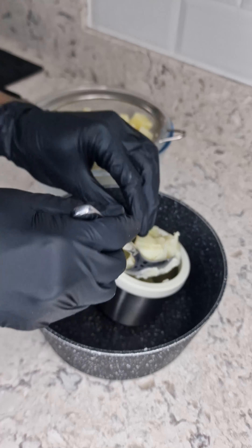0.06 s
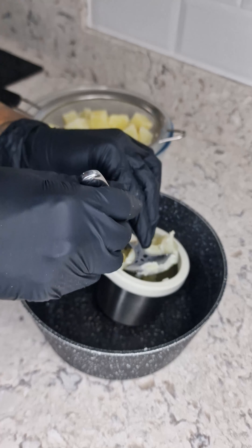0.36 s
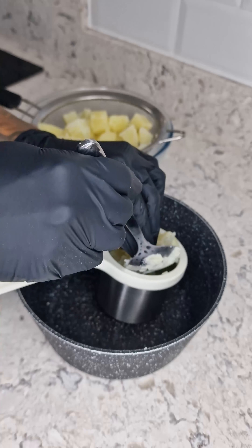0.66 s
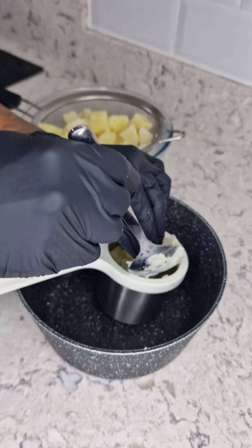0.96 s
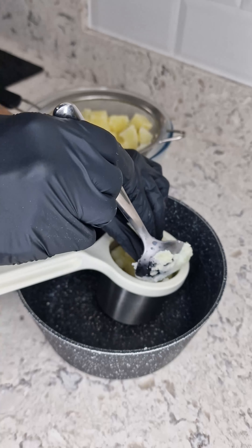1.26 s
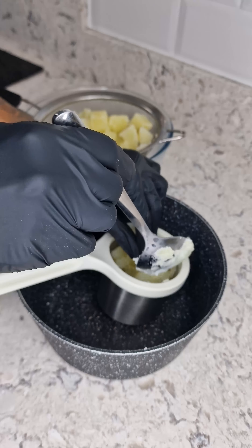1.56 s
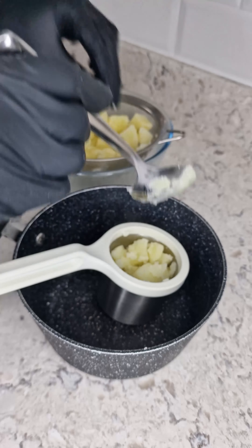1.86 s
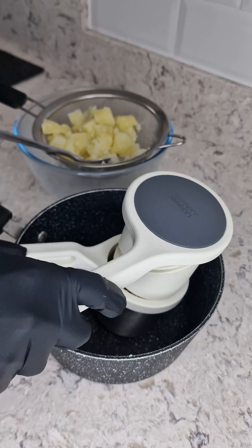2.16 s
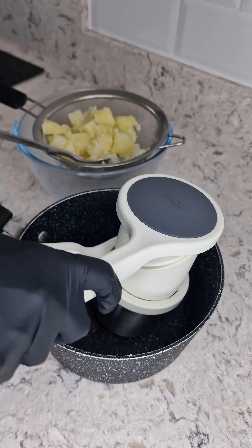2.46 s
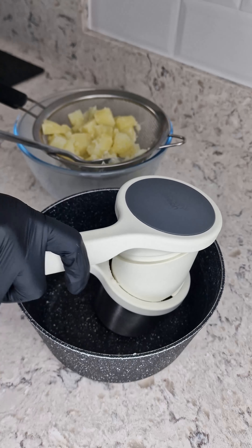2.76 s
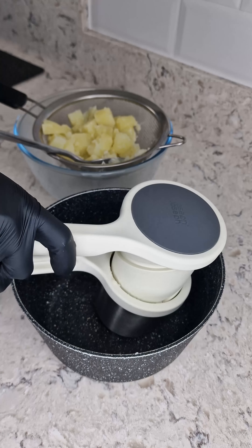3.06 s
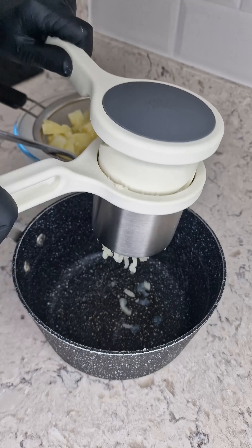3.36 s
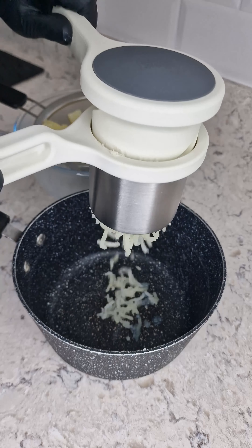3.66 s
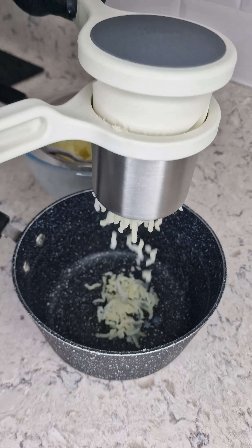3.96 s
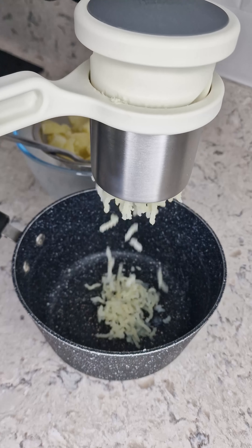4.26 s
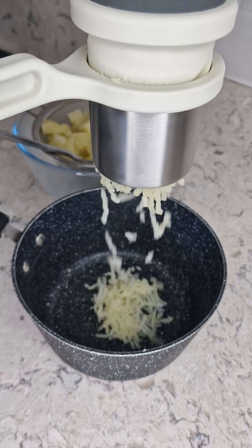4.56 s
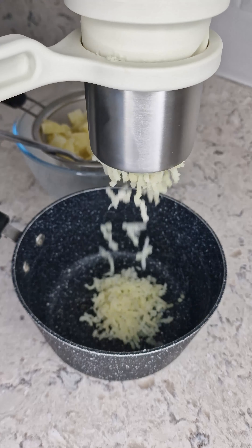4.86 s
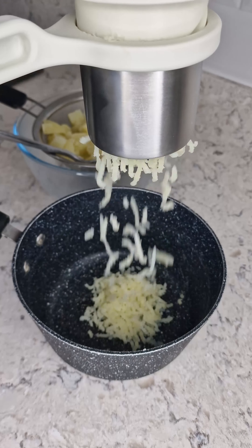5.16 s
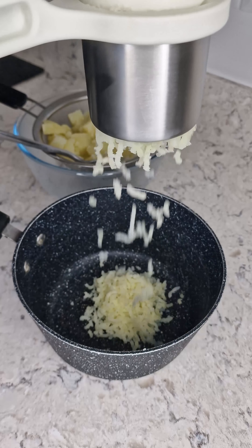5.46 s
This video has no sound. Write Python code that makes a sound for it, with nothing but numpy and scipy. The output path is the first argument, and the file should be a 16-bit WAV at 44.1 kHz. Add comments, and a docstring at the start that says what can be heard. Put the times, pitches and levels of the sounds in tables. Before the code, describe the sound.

Close stereo microphones pick up a small kitchen with a low, steady rumble. In the first second a spoon loads cooked potato into a metal ricer with faint wet smacks and soft nudges against a pot, clinking once at about 0.6 seconds. After a lull and some light handling, the ricer knocks hollowly on the pot at 2.3 seconds with a brief steel rattle, and the plunger rubs faintly down the cup. At 3 seconds comes a second rattling knock, the loudest sound, its ringing cut off abruptly just after 3.1 seconds. Wet potato then fizzes and crackles quietly through the holes. Trapped air spits out in short bursts, strongest from 3.6 to 3.9 seconds and again between 4.2 and 4.7. Soft strands patter into the pot with a few low plops, and the crackle thins away toward the end at about 5.6 seconds.

```python
"""A small kitchen, a spaced microphone pair close to a potato ricer standing in a pot on a stone worktop.
A spoon fills the ricer with faint wet smacks and clinks once. The steel parts rattle, the plunger rubs
down the cup, and the ricer knocks twice on the pot. At 3.144 s an abrupt cut ends the knocks' ringing
and the sound of pressing above the pot begins: wet potato fizzes through the holes, trapped air spits
out, and soft strands patter down over the low rumble of the room."""
import sys
import numpy as np
from scipy import signal
from scipy.fft import rfft, irfft
from scipy.io import wavfile

SR = 44100
rng = np.random.default_rng(int(sys.argv[2]) if len(sys.argv) > 2 else 0)


def unload_audio(sound):
    """Save the sound as a 16-bit wav file, at the path given as the first command line argument."""
    columns = np.transpose(np.atleast_2d(sound))
    # keep every value between -1 and 1, then stretch to whole-number steps
    steps = np.round(np.clip(columns, -1, 1) * 32767)
    wavfile.write(sys.argv[1], SR, steps.astype(np.int16))


N = 246959
T = np.arange(N) / SR
RING = T[:SR * 3 // 4]  # time axis of one short sound
BREAK_S = 3.144  # a cut ends the knocks' ringing and reverb; the pressing sound begins

# the quiet kitchen: f/Hz, level/dB
ROOM_SPECTRUM = [(15, -2.5), (30, 2.5), (50, 2.5), (90, -9.5), (130, -8), (200, -28), (400, -28),
                 (500, -37), (590, -23), (750, -38), (2000, -43), (7000, -49.5), (16000, -65)]
# the pot with the ricer in it, and the worktop under it: f/Hz, level/dB, t60/s
POT_MODES = [(226, -22, 0.53), (296, -21, 0.39), (319, -12, 0.14), (426, -12.5, 0.27), (457, -14.5, 0.36),
             (504, -8, .2), (545, -12, 0.095), (607, -4.5, 0.67), (648, 3.5, .1), (670, -7.5, 0.12),
             (710, -14.5, .18), (750, -7.5, 0.054), (822, -14, 0.11), (979, -14, 0.12), (1110, -9.5, 0.054),
             (1162, -10, 0.072), (1405, -12.5, 0.08), (1823, -20.5, 0.067), (2050, -20.5, 0.18)]
WORKTOP_MODES = [(131, -9.5, 0.17), (180.3, -17.5, 0.097)]
# the dense, short part of a blow: f/Hz, level/dB
THUD_SPECTRUM = [(50, -12), (130, -0.5), (300, -17.5), (600, 7), (900, -8.5), (1500, -6), (3000, -13.5),
                 (8000, -41), (16000, -31)]
# soft nudges of the pot as the ricer is handled: t/s, level/dB, low-pass f/Hz
POT_NUDGES = [(0.058, -52, 1160), (0.25, -55.5, 425), (0.528, -51.5, 625), (0.769, -60, 565),
              (1.977, -55, 1400), (2.24, -37.5, 143), (2.261, -42, 640), (2.848, -43, 170)]
# wet smacks of potato on spoon and strands: t/s, level/dB, length/s, f/Hz
WET_SMACKS = [(0.18, -76.5, 0.034, 6040), (0.475, -70.5, 0.034, 5130), (0.553, -64.5, 0.028, 7240),
              (1.037, -72, 0.0065, 7800), (2.073, -73.5, 0.0027, 7350), (3.135, -72, 0.086, 2170),
              (3.143, -55.5, 0.037, 11600), (3.403, -61, 0.023, 1280), (3.931, -66.5, 0.02, 1260),
              (4.539, -56, 0.016, 1370), (4.769, -61.5, 0.0044, 7800), (4.815, -69.5, .012, 4080),
              (4.915, -61.5, 0.0029, 1640), (4.947, -62.5, 0.003, 2800), (4.977, -60.5, 0.0022, 7100),
              (5.062, -67, 0.0038, 7640), (5.292, -69.5, 0.0044, 4550)]
# the spoon against the rim: t/s, level/dB
SPOON_CLINKS = [(0.585, -65), (0.6, -44.5), (0.6067, -55.5)]
# the spoon and the rim it strikes: f/Hz, level/dB, t60/s
SPOON_MODES = [(402.5, -17.5, 0.59), (515, 1.5, 0.11), (1014, -26, 0.32), (1096, 9.5, 0.041),
               (1112, -18.5, 0.23), (1160, -9, 0.16), (1407, -23, 0.16), (2034, -14.5, 0.097),
               (2606, -2, 0.043), (2624, -7, 0.076)]
# the clack of spoon on plastic rim: f/Hz, level/dB
CLACK_SPECTRUM = [(200, -1.5), (450, 10), (750, -4), (1000, -2), (1170, 4), (1400, 3), (2200, -4),
                  (2600, 2), (3000, -21), (4200, -15), (8000, -39), (16000, -37)]
# cup and plunger chattering: t/s, level/dB, length/s, low-pass f/Hz, relative cup ring/dB
STEEL_RATTLES = [(1.978, -61, 0.0075, 4250, -33), (2.334, -41, 0.0087, 2440, -21.5),
                 (3.017, -24, 0.011, 3856, -23), (3.021, -37, 0.0084, 12750, -19)]
# the steel cup: f/Hz, level/dB, t60/s
CUP_MODES = [(2147, -5, 0.26), (2640, 0.5, 0.088), (3570, -6.5, .18), (4503, -4, 0.18), (5520, -7, 0.16),
             (7393, -4.5, 0.12), (8060, -2, 0.33), (8320, -1, 0.3), (7680, -17, .16), (11200, -12, .12)]
# hard knocks on the pot: t/s, level/dB, low-pass f/Hz, relative worktop thump/dB, first bounce after/s
RICER_KNOCKS = [(2.332, -25, 850, 3, .0242), (2.338, -26, 1700, 2, .0225), (2.995, -28, 1200, 3, .028),
                (3.016, -12.5, 1900, -5, .022)]
# the plunger rubbing the cup wall, then crushing the potato: t/s, hold/s, level/dB
PLUNGER_RUBS = [(2.36, 0.12, -69), (2.58, 0.42, -68.5)]
PLUNGER_CRUSHES = [(2.83, 0.28, -62), (2.9, 0.024, -67.5)]
# the tone of that rubbing and crushing: f/Hz, level/dB
RUB_SPECTRUM = [(100, -26.5), (300, -10.5), (520, -3.5), (660, 5.5), (850, -16.5), (1170, 0.5),
                (1600, -14.5), (2500, -27.5), (6000, -30.5)]
CRUSH_SPECTRUM = [(500, -24.5), (900, -12.5), (1190, 11.5), (1900, -6), (2550, 1.5), (3400, -3), (4500, -8),
                  (7500, -12), (10000, -15), (16000, -19.5)]
# squeezes of the handles that drive potato through the holes: t/s, hold/s, level/dB
HANDLE_SQUEEZES = [(3.1, 0.054, -70.5), (3.25, 0.31, -76), (3.56, 0.29, -63.5), (4.21, 0.58, -76)]
# wet potato in the holes, and strands landing in the pot: f/Hz, level/dB
FIZZ_SPECTRUM = [(500, -45), (900, -14.5), (1300, -4), (1700, -16), (2500, -4), (3400, -8.5), (4200, -7.5),
                 (6000, -6), (7500, -1), (9500, -10.5), (11500, -6), (15000, -11)]
PATTER_SPECTRUM = [(80, -29), (140, 13.5), (250, -35), (430, 4.5), (560, -3), (660, 14.5), (800, -14.5),
                   (1000, -3), (1300, 11.5), (1900, -8.5), (4000, -28), (9000, -40)]
# larger air pockets escaping: t/s, level/dB, length/s, whistle f/Hz
AIR_SPITS = [(3.229, -61, 0.0016, 11200), (3.264, -55, 0.0099, 2030), (3.301, -56, 0.0038, 8400),
             (3.406, -54, 0.0033, 6500), (3.571, -45, 0.002, 6760), (3.601, -56.5, .007, 4220),
             (3.639, -39.5, .0091, 5940), (3.701, -35.5, 0.005, 2700), (3.802, -44.5, 0.0032, 2800),
             (3.818, -48.5, 0.0076, 5200), (3.854, -49, 0.0035, 2670), (3.879, -51.5, 0.0079, 4130),
             (4.206, -45, 0.0045, 2900), (4.264, -54.5, 0.02, 2880), (4.298, -56, 0.028, 2960),
             (4.442, -54.5, 0.018, 2890), (4.485, -50.5, 0.0031, 2880), (4.555, -52, 0.013, 12000),
             (4.661, -59.5, 0.0026, 3216), (4.692, -51.5, 0.0032, 7650)]
# the spitting air: f/Hz, level/dB
SPIT_SPECTRUM = [(100, -27), (400, -5.5), (750, -23), (1400, -5), (2000, 1), (2700, 3.5), (3300, 1),
                 (4200, 0.5), (6000, 3), (7600, 9.5), (9500, -0.5), (11500, 6), (16000, -2.5)]
# thumps of escaping air (first two rows), then strands landing: t/s, level/dB, low-pass f/Hz
LOW_PLOPS = [(4.211, -50.5, 1500), (4.555, -55.5, 1200), (4.746, -57, 900), (4.835, -48.5, 990),
             (4.866, -84, 702), (4.945, -59, 830), (5.297, -53.5, 750), (5.52, -63.5, 740)]


def amp(db):
    """Decibels to gain."""
    return 10 ** (np.asarray(db) / 20)


def unit(x):
    """Scale to rms 1."""
    return x / np.sqrt(np.mean(x ** 2))


def colour(x, points, tilt_db=0):
    """Give x a spectrum of (f/Hz, level/dB) points, tilted per octave; rms 1."""
    hz, db = np.transpose(points)
    octave = np.log2(np.fft.rfftfreq(len(x), 1 / SR) + 1)
    gain = amp(np.interp(octave, np.log2(hz), db) + tilt_db * octave)
    return unit(irfft(rfft(x) * gain, len(x)))


def soften(x, hz, order=2):
    """Low-pass: a softer contact lasts longer."""
    return signal.sosfilt(signal.butter(order, hz, fs=SR, output="sos"), x)


def thin(x, hz):
    """High-pass: small bodies radiate no deep bass."""
    return signal.sosfilt(signal.butter(2, hz, "high", fs=SR, output="sos"), x)


def ring(modes):
    """Impulse response of damped modes."""
    return sum(amp(db - 60 * RING / t60) * np.sin(2 * np.pi * hz * RING) for hz, db, t60 in modes)


def grains(size, per_s, spread_db):
    """Random clicks, many small and a few large."""
    occurs = rng.random(size) < per_s / SR
    height = np.minimum(rng.exponential(size=size), np.pi)
    return occurs * rng.choice([-1, 1], size) * amp(spread_db * height)


def burst(length):
    """Envelope that opens at once, holds for its length and collapses."""
    return (1 - np.exp(-RING / .0005)) / np.sqrt(1 + (RING / length) ** 6) * np.exp(-RING / .2)


def efforts(rows, attack_s, release_db_per_s):
    """Gain over time of pushes by hand: each builds up, holds and dies away."""
    return sum(np.clip((T - s) / attack_s, 0, 1) * amp(db - release_db_per_s * np.maximum(T - s - hold, 0))
               for s, hold, db in rows)


def pan(left_db):
    """Gains that make the left microphone louder than the right by left_db."""
    return amp(np.array([[left_db], [-left_db]]) / 2)


def add(track, s, sound):
    """Mix a sound in at time s."""
    start = int(s * SR)
    part = sound[..., :N - start]
    track[..., start:start + part.shape[-1]] += part


def room_tone(level_db=-65, side_db=-20):
    """Low steady rumble with a faint hiss, nearly alike at both microphones."""
    mid = colour(rng.standard_normal(N), ROOM_SPECTRUM)
    side = amp(side_db) * colour(rng.standard_normal(N), ROOM_SPECTRUM)
    return amp(level_db) * np.array([mid + side, mid - side])


def blow(db, cutoff_hz, thump_db, thud_db=-10, thud_t60=0.13):
    """One contact thuds, rings the pot and thumps the worktop."""
    pot = thin(ring(POT_MODES), 410) / 2
    thud = colour(rng.standard_normal(len(RING)), THUD_SPECTRUM) * amp(thud_db - 60 * RING / thud_t60)
    thump = amp(thump_db) * ring(WORKTOP_MODES)
    return amp(db) * thin(soften(pot + thud + thump, cutoff_hz, order=4), 71)


def nudges(rise_s=0.0015, damping_s=0.082):
    """Handling nudges the pot softly, and the gloved hand stills it."""
    out = np.zeros(N)
    held = (1 - np.exp(-RING / rise_s)) * np.exp(-RING / damping_s)
    for s, db, hz in POT_NUDGES:
        add(out, s, blow(db, hz, thump_db=3.5) * held)
    return out


def smacks(shoulder_db=-11, skirt_db=-22, swell=0.23):
    """Wet films part with a short crackle around one pitch; a long one swells in slowly."""
    out = np.zeros(N)
    for s, db, length, hz in WET_SMACKS:
        band = [(hz / 8, 2 * skirt_db), (hz / 2, skirt_db), (hz / 1.27, shoulder_db),
                (hz, 0), (hz * 1.26, shoulder_db), (hz * 2, skirt_db)]
        crackle = colour(grains(len(RING), per_s=5000, spread_db=6.2), band)
        envelope = burst(length) * (1 - np.exp(-RING / (swell * length)))
        add(out, s, amp(db) * envelope * crackle)
    return out


def spoon(clack_db=-5, ring_db=-4):
    """The loaded spoon clacks on the rim and rings briefly."""
    out, modes = np.zeros(N), ring(SPOON_MODES)
    for s, db in SPOON_CLINKS:
        clack = colour(rng.standard_normal(len(RING)), CLACK_SPECTRUM) * burst(0.0043)
        add(out, s, amp(db) * (amp(ring_db) * modes + amp(clack_db) * clack))
    return thin(out, 140)


def rattles():
    """Loose parts chatter for a few milliseconds and leave the steel cup ringing."""
    out, cup = np.zeros(N), ring(CUP_MODES)
    for s, db, length, hz, ring_db in STEEL_RATTLES:
        chatter = unit(grains(len(RING), per_s=7200, spread_db=1.5)) * burst(length)
        add(out, s, amp(db) * soften(chatter + amp(ring_db) * cup, hz))
    return thin(out, 620)


def knocks(bounces=4, shortening=0.95, loss_db=9, dulling=0.62):
    """The ricer strikes the pot and rocks on it, each bounce sooner, weaker and duller."""
    out = np.zeros(N)
    for s, db, hz, thump_db, gap in RICER_KNOCKS:
        for k in range(bounces + 1):
            add(out, s, blow(db - k * loss_db, hz * dulling ** np.sqrt(k), thump_db))
            s += gap * shortening ** k
    return out


def plunger(attack_s=0.023, release_db_per_s=151):
    """The plunger rubs down the cup in fine slips and starts to crush the potato."""
    slips = colour(grains(N, per_s=900, spread_db=3), RUB_SPECTRUM)
    squish = colour(grains(N, per_s=3000, spread_db=3.9), CRUSH_SPECTRUM)
    return (slips * efforts(PLUNGER_RUBS, attack_s, release_db_per_s)
            + squish * efforts(PLUNGER_CRUSHES, attack_s, release_db_per_s))


def flow(seep_db=-86):
    """How fast potato passes the holes, as a gain; it seeps on between squeezes."""
    return efforts(HANDLE_SQUEEZES, attack_s=0.02, release_db_per_s=83) + amp(seep_db)


def holes(size, spectrum, per_s, spread_db, tilt_db=0, width=0.71):
    """Crackle from many holes: the middle ones reach both microphones, those at each edge only one."""
    middle, left, right = (colour(grains(size, per_s, spread_db), spectrum, tilt_db) for _ in range(3))
    return unit(middle + width * np.array([left, right]))


def fizz(fit_s=0.0041, steady=2.1):
    """Tiny bubbles fizz with the flow, in short fits as single holes clog and open again."""
    openings = np.abs(grains(N, per_s=55, spread_db=7.2))
    fits = steady + unit(signal.fftconvolve(openings, burst(fit_s))[:N])
    crackle = holes(N, FIZZ_SPECTRUM, per_s=3500, spread_db=4.3)
    return unit(crackle * fits) * flow() * (T > BREAK_S) * pan(left_db=2)


def strands(level_db=-76, tap_s=0.0038, fall_s=0.04, growth=0.54):
    """Soft strands fall and patter on the bottom of the pot; the patter grows more slowly than the flow."""
    impacts = grains(N, per_s=60, spread_db=5)
    tap = rng.standard_normal(len(RING)) * np.exp(-RING / tap_s)
    patter = colour(signal.fftconvolve(impacts, tap)[:N], PATTER_SPECTRUM)
    landing = np.interp(T - fall_s, T, flow())
    return amp(level_db) * patter * (landing / landing.max()) ** growth * (T > BREAK_S)


def bubbles(count=70, low_hz=1523, high_hz=7040, decay_cycles=6.3):
    """Bubbles burst at random in the wet strands, each a short ping, louder when the flow is fast."""
    out, speed = np.zeros(N), flow()
    for when, pitch, strength in rng.random((count, 3)):
        s = BREAK_S + when * (T[-1] - BREAK_S)
        hz = low_hz * (high_hz / low_hz) ** pitch
        ping = np.sin(2 * np.pi * hz * RING) * np.exp(-np.minimum(RING * hz / decay_cycles, 20))
        add(out, s, speed[int(s * SR)] * amp(3 + 8 * strength) * ping)
    return out


def spits(whistle_db=3, whistle_q=7, darkening=0.22):
    """Air pockets sputter out, each with its own narrow whistle; a big one sounds darker."""
    out = np.zeros((2, N))
    for s, db, length, hz in AIR_SPITS:
        tilt_db = -1.83 - darkening * (db + 50)  # per octave, steeper for a louder spit
        sputter = holes(len(RING), SPIT_SPECTRUM, per_s=16000, spread_db=2.56, tilt_db=tilt_db)
        whistle = signal.lfilter(*signal.iirpeak(hz, whistle_q, fs=SR), sputter)
        add(out, s, amp(db) * unit(sputter + amp(whistle_db) * whistle) * burst(length))
    return out * pan(left_db=1)


def plops(decay_s=0.015, rise_s=0.0023, thump_db=-6, pot_db=-11):
    """Soft low plops that ring the pot: thumps of escaping air, and strands landing."""
    out, pot = np.zeros(N), thin(ring(POT_MODES), 800)
    for s, db, hz in LOW_PLOPS:
        thump = colour(rng.standard_normal(len(RING)), PATTER_SPECTRUM) * np.exp(-RING / decay_s)
        plop = (amp(thump_db) * thump + amp(pot_db) * pot) * (1 - np.exp(-RING / rise_s))
        add(out, s, amp(db) * soften(plop, hz, order=4))
    return out


def over_pot(x, echo_db=-11.5, delay_s=0.001278, growth_s_per_s=0.000364):
    """The bottom of the pot throws back a hollow echo, later as the ricer is lifted."""
    delay = delay_s + growth_s_per_s * (T - BREAK_S)
    return x + amp(echo_db) * np.array([np.interp(T - delay, T, channel) for channel in x])


def kitchen(x, room_db, pot_db=-7, lag_s=.00007, common=1, t60=0.35, treble_t60=0.2, scatter_s=0.00083):
    """Two spaced microphones hear the source, its scatter off the pot wall, and the room."""
    mid, side = rng.standard_normal((2, len(RING)))
    side = thin(side, 380)  # the bass is alike at both microphones
    noise = np.array([common * mid + side, common * mid - side])
    low = soften(noise, 2100)
    tail = (low * 1e-3 ** (RING / t60) + (noise - low) * 1e-3 ** (RING / treble_t60)) * (RING > .005)
    scatter = thin(noise, 750) * np.exp(-RING / scatter_s)
    echo = sum(amp(db) * h / np.sqrt(np.sum(h ** 2) / 2) for h, db in [(tail, room_db), (scatter, pot_db)])
    x = np.broadcast_to(x, (2, N))
    direct = np.array([x[0], np.roll(x[1], int(lag_s * SR))])  # the right one is a little further away
    return direct + signal.fftconvolve(x, echo, axes=1)[:, :N]


def scene():
    """Filling and closing, a cut that chops off their ringing and reverb, then the pressing."""
    pot = kitchen(knocks() + nudges() + plunger(), room_db=-6, pot_db=0.5, lag_s=.00005)
    steel = kitchen(rattles(), room_db=-5.5, pot_db=1, lag_s=.00003, treble_t60=0.32)
    clink = kitchen(spoon(), room_db=-8.5, pot_db=1.5, lag_s=.00003)
    before_cut = (pot + steel + clink) * np.clip((BREAK_S - T) / .001, 0, 1)
    wet_sounds = thin(fizz() + spits(), 256) + smacks() + bubbles()
    potato = kitchen(over_pot(wet_sounds), room_db=-6, pot_db=1, lag_s=.00008, scatter_s=0.0008)
    in_pot = kitchen(strands() + plops(), room_db=-2.5, common=0.84)
    return before_cut + potato + in_pot + room_tone()


def record(dry):
    """The microphone signal is cut steeply above 16 kHz."""
    return signal.sosfilt(signal.ellip(10, .2, 70, 16000, fs=SR, output="sos"), dry)


dry = scene()
out = record(dry)
unload_audio(out)
```